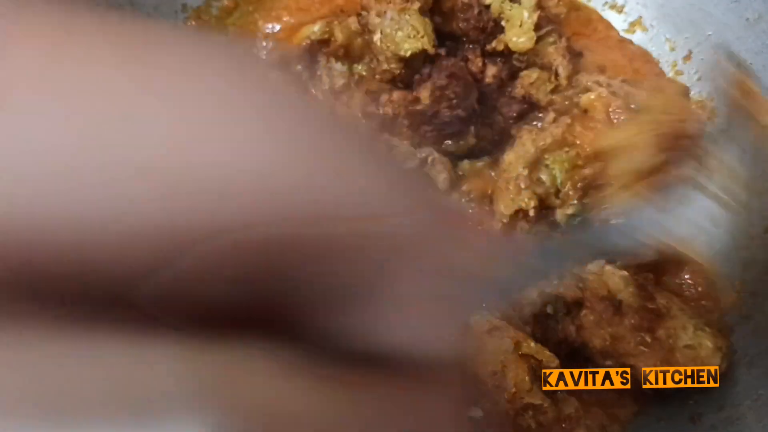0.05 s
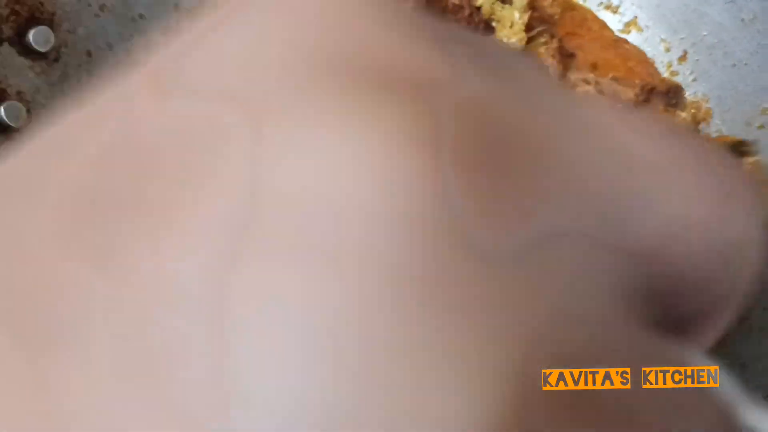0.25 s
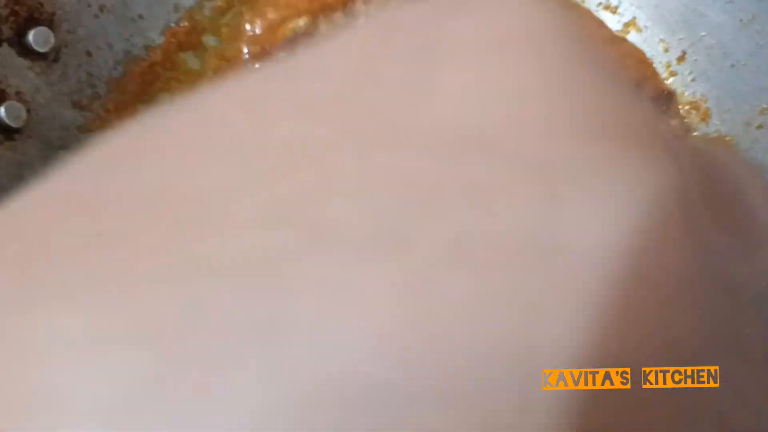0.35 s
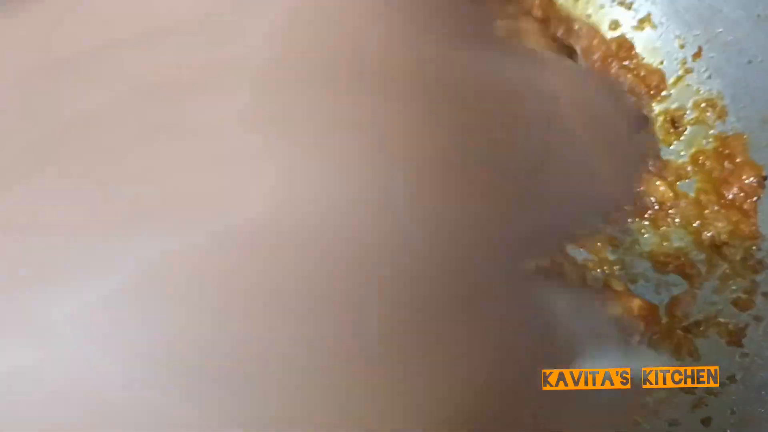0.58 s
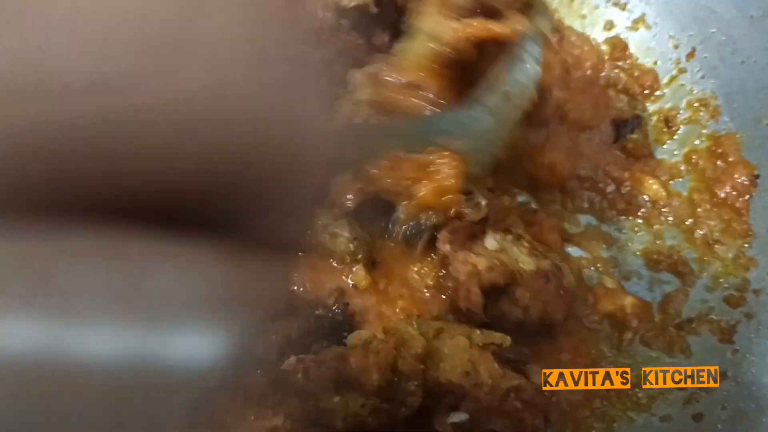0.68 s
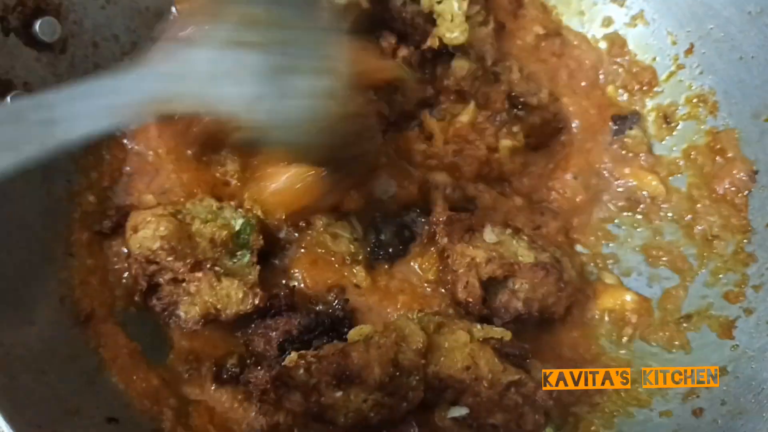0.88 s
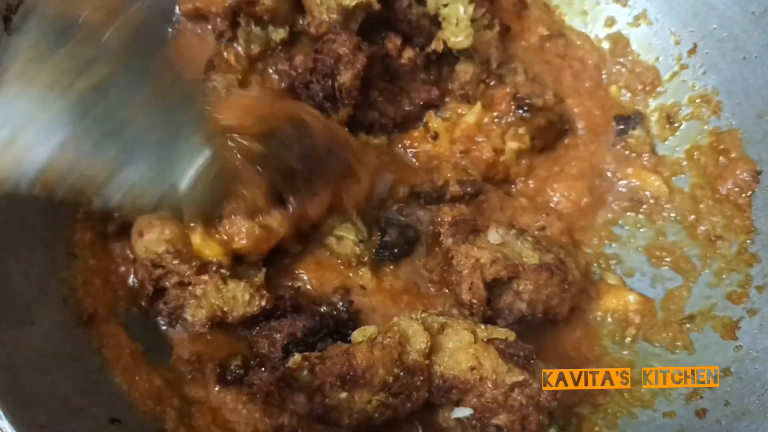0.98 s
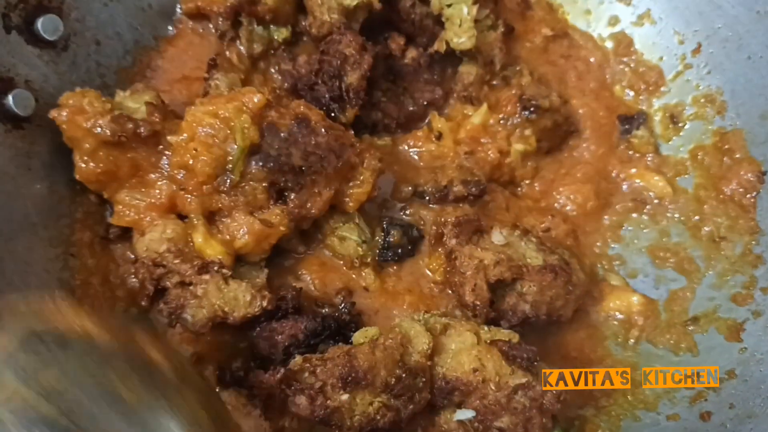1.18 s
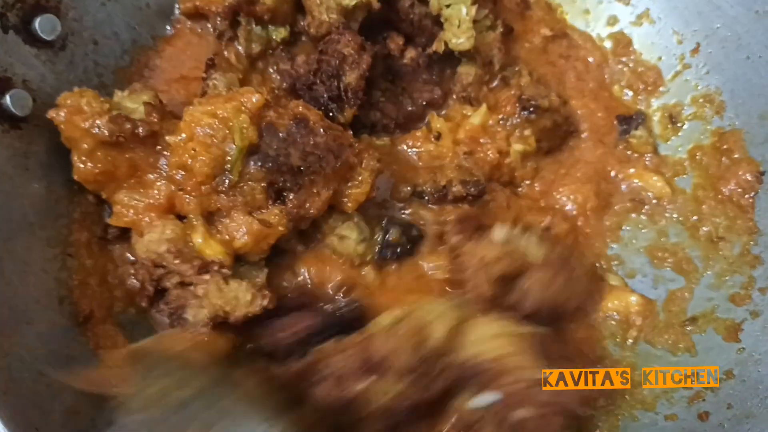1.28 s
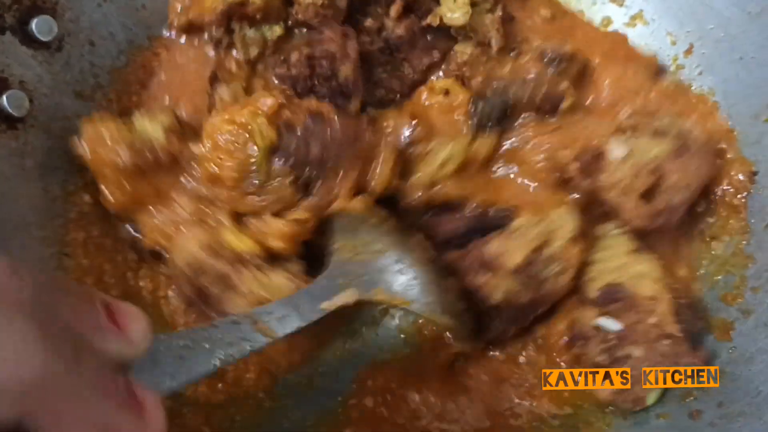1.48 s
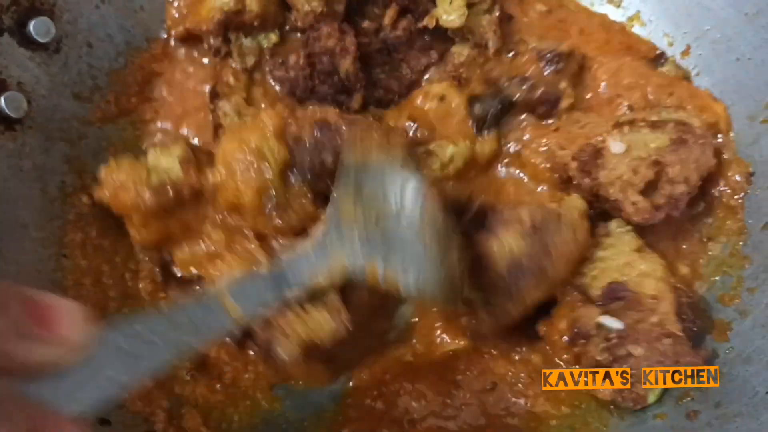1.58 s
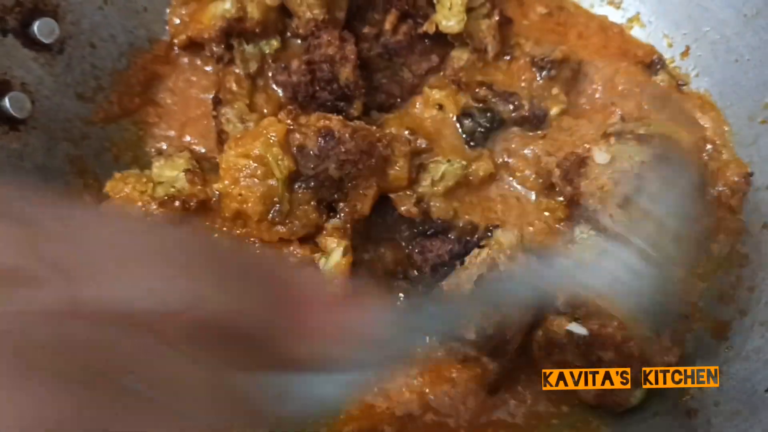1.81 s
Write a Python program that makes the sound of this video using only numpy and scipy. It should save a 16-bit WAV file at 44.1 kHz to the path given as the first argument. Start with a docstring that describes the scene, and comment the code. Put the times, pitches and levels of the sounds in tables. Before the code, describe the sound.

Metal spoon scraping a pan bottom, three gritty strokes with sharp clacks and small wet ticks

```python
"""Metal spoon stirs thick curry in a metal pan, close to the microphone in a small kitchen.
Light drags and thin pan notes lead into a first scrape: stick-slip grains through a pan colour.
It grows duller as the spoon slows; wet ticks (short noise bursts) and soft notes follow.
A second and a third scrape each start with a sharp clack; a low resonance rises within the second.
Drags, notes and ticks fall around them; sizzle grains and air, rising and falling in level, run throughout."""
import sys
import numpy as np
from scipy import signal
from scipy.fft import rfft, irfft, next_fast_len
from scipy.io import wavfile
from scipy.ndimage import uniform_filter1d

SR = 44100
rng = np.random.default_rng(int(sys.argv[2]) if len(sys.argv) > 2 else 0)


def unload_audio(sound):
    """Save the sound as a 16-bit wav file, at the path given as the first command line argument."""
    columns = np.transpose(np.atleast_2d(sound))
    # keep every value between -1 and 1, then stretch to whole-number steps
    steps = np.round(np.clip(columns, -1, 1) * 32767)
    wavfile.write(sys.argv[1], SR, steps.astype(np.int16))


N = 81585
T = np.arange(N) / SR

# scrape force: t/s, level/dB
FORCE_1 = [(.1425, -24), (.1445, -24), (.2, -23.5), (.25, -30), (.3, -40.5), (.36, -79), (.4, -75)]
FORCE_2 = [(.787, -33), (.8, -36), (.86, -30.5), (.9, -35), (.95, -41.5), (1.0, -57.5), (1.03, -61)]
FORCE_3 = [(1.456, -39), (1.473, -41.5), (1.505, -34), (1.518, -31.5), (1.54, -34.5), (1.585, -39.5),
           (1.645, -38.5), (1.7, -55.5), (1.76, -127)]
# pan colour where each stroke rubs: f/Hz, level/dB
COLOUR_1 = [(76, -86), (130, -19.5), (303, -12), (394, -9.5), (660, -12.5), (829, -11.5), (935, -21.5),
            (1060, -3.5), (1520, -16), (2140, -5.5), (3200, -12), (6600, -16.5), (7910, -26), (9870, -21),
            (13100, -40), (15100, -25), (16000, -38)]
COLOUR_2 = [(76, -74), (130, -41), (263, -20.5), (342, 2), (410, -10.5), (650, -10), (917, -11),
            (1030, -14), (1400, -10.5), (1680, 0.5), (1930, -13), (2560, -0.5), (2830, -9.5), (4780, -12),
            (6340, -10), (8070, -21.5), (10300, -9.5), (13300, -34), (16000, -19)]
COLOUR_3 = [(76, -40), (130, -15), (260, -16), (349, -2), (402, -3), (570, -16.5), (812, 2.5),
            (1270, -39.5), (1430, -16), (1680, -13), (2510, -4), (3010, -11), (3530, -23), (4150, -4),
            (5960, -18), (6470, -2), (8230, -18), (9670, -11), (11800, -15), (12800, -51), (14200, -19),
            (16000, -26)]
# scrapes: force, colour, dulling/(dB per s per kHz), pan ring/dB, bass rise/s
SCRAPES = [(FORCE_1, COLOUR_1, 18.4, -14, 0.008), (FORCE_2, COLOUR_2, 7.1, -11.5, 0.095),
           (FORCE_3, COLOUR_3, 8.6, -18, 0.0075)]
# pan modes: f/Hz, level/dB, t60/s
PAN_MODES = [(625, 8, .08), (1028, 2, .16), (1225, 3, .16), (1345, -1, .16), (2072, 2.5, .2), (2200, 3, .2),
             (2466, 1, .18), (2670, -4, .18), (3130, -1, .15)]
# spoon landing: t/s, level/dB, decay/s, ring f/Hz, ring level/dB, ring decay/s, thump level/dB,
# right minus left/dB (crack and ring, ahead of the port balance)
CLACKS = [(0.7874, -12.5, 0.0024, 2600, -17.5, 0.0026, -46.5, 2.5),
          (1.4558, -19, 0.0044, 4640, -29, 0.0032, -60.5, -0.5)]
# colour of the crack: f/Hz, level/dB
CLACK_COLOUR = [(200, -50), (900, -14), (1450, -32), (1800, -29.5), (2750, 3.5), (3600, -12), (5000, -10),
                (7000, 0.5), (8200, -9), (9500, 3), (11000, -4.5), (13000, -16), (15000, -2), (16000, -2.5)]
# drags, one resonance each: peak t/s, rise/s, fall/s, level/dB, centre f/Hz, width/octave
DRAGS = [(.003, 0.033, 0.018, -40.5, 2310, 0.28), (.075, 0.02, 0.021, -56.5, 4140, 0.15),
         (1.045, 0.026, 0.059, -53, 2090, 0.4), (1.06, 0.08, 0.049, -61, 4900, 0.051),
         (1.496, 0.022, 0.017, -40.5, 351, 0.11), (1.169, 0.036, 0.013, -62.5, 3760, .05),
         (1.29, 0.026, 0.051, -68, 3620, 0.043), (1.73, 0.17, 0.0074, -58.5, 1500, 0.12),
         (1.79, 0.018, 0.0048, -56, 3960, 0.087)]
# thin notes of the pan: peak t/s, swell/s, level/dB, f/Hz
NOTES = [(0.018, 0.05, -53, 2300), (.005, 0.043, -48, 3180), (0.009, 0.026, -60.5, 3500),
         (.02, 0.012, -55, 4360), (0.091, 0.041, -59, 1440), (0.3, 0.066, -52.5, 2070),
         (0.31, 0.057, -54, 3760), (1.05, 0.018, -57, 2400), (1.54, 0.044, -52, 2424),
         (1.609, 0.021, -50, 1410)]
# hollow opened in the sauce: t/s, f/Hz, level/dB
HOLLOW = [(0.793, 345.2, -62), (.835, 346.4, -39.5), (.91, 356, -49.5), (.935, 487, -39), (0.981, 499, -45),
          (1.02, 505, -84)]
# pushes that rock the pan: start t/s, end t/s, level/dB
PUSHES = [(0.172, 0.325, -52), (1.496, 1.664, -63.5)]
# low modes of the rocking pan: f/Hz, relative level/dB
THRUM_MODES = [(85.5, 3), (112, -4)]
# wet ticks and small touches: t/s, level/dB, f/Hz, decay/s
TICKS = [(.4295, -47, 3900, .002), (.4946, -42.5, 6500, .001), (.525, -44, 5200, .002),
         (.5834, -46, 4770, .0015), (1.2221, -49, 10400, .0015), (1.3892, -47, 4190, .002),
         (1.7074, -32, 5300, .0012), (1.5218, -22, 10200, .0012), (1.7108, -40, 4800, .003),
         (1.711, -42, 10000, .004), (1.7625, -30, 10000, .0012), (1.7772, -43, 4200, .0015),
         (1.8438, -46, 2300, .003)]
# sizzle bubbles by size: f/Hz, level/dB ahead of BACK_GAIN, width/octave
SIZZLE = [(5060, -70.5, 0.45), (10180, -68.5, .08), (14800, -84.5, 0.027)]
# colour of the kitchen air: f/Hz, level/dB
AIR_COLOUR = [(25, -8), (90, 0.5), (140, -7), (240, 4.5), (350, 5), (480, -1.5), (900, -3), (1500, -8.5),
              (2100, -5.5), (5500, -12.5), (8200, -30.5), (10000, -10.5), (13300, -52), (15500, -9.5)]
# gain on sizzle and air: t/s, level/dB
BACK_GAIN = [(0, 6), (.42, 1), (.48, 3.5), (.76, 1.5), (.87, 11), (1.15, 0), (1.235, -5), (1.25, 3.5),
             (1.45, -0.5), (1.85, 0)]
# room decay: f/Hz, t60/s
ROOM_DECAY = [(300, 0.17), (2500, 0.32), (8000, 0.17), (16000, 0.025)]
# port balance, left minus right: f/Hz, level/dB
BALANCE = [(100, 0.5), (1000, -1.7), (2500, 0.6), (5000, 1), (9500, 0), (12500, -6), (15500, -10)]

SLIPS_PER_S, SLIP_SPREAD_DB = 7000, 3.0
JUDDER_DB, JUDDER_SMOOTH_S = 1.8, 1 / 91.4
BASS_HZ = 620
METAL_COUNT, METAL_SHARE, METAL_T60_S = 160, .6, .08
THUMP_HZ, THUMP_DECAY_S = 129, 0.0044
NOTE_WAVER_HZ, HOLLOW_WAVER_HZ, THRUM_WAVER_HZ, WAVER_SMOOTH_S = 16, 18, 8, .012
PUSH_EDGE_S = 0.02
TICK_WIDTH_OCTAVE_HZ = 850  # width/octave times f/Hz
POPS_PER_S, POP_SPREAD_DB = 1500, 4.2
AIR_DB, AIR_SHARED = -65, 0.44  # AIR_DB ahead of BACK_GAIN
ROOM_DB = -5.5
LEFT_LATE_S, SHARED = 0.000866, 0.34  # SHARED: power share common to both ports
EDGE_HZ = 16100
FRAME, HOP = 256, 128  # STFT samples


def scrape(force, colour, dulling, ring_db, bass_rise_s, rubbing):
    """Stick-slip grains drive the pan; bass builds up, treble fades as the spoon slows in the sauce."""
    level = amp(np.interp(T, *np.transpose(force), left=-150, right=-150))
    judder = smooth_noise(JUDDER_SMOOTH_S)
    slips = rubbing * amp(JUDDER_DB * judder)
    hz, t, z = signal.stft(tint(slips, colour), SR, nperseg=FRAME)
    hz = hz[:, None]
    t = np.clip(t, force[0][0], force[-1][0])
    # neutral at the energy centre: brighter before, duller after
    centre_s = np.average(T, weights=level ** 2)
    dull = amp(-dulling * (t - centre_s) * np.minimum(hz, 11000) / 1e3)
    build = 1 - np.exp(-(t - force[0][0]) / bass_rise_s - (hz / BASS_HZ) ** 2 / 2)
    # moving contact shifts the resonances; grit catches in bursts; bass is spared
    shifts = patches(z.shape[1:], depth_db=2.9, length_s=.07, width_hz=350)
    bursts = patches(z.shape[1:], depth_db=2.3, length_s=.014, width_hz=1400)
    grit = (shifts * bursts) ** (hz / (hz + BASS_HZ))
    rub = level * signal.istft(z * dull * build * grit, SR, nperseg=FRAME)[1][:, :N]
    rub = signal.sosfilt(signal.butter(2, 70, "high", fs=SR, output="sos"), rub)
    return rub + amp(ring_db) * ring(rub, PAN_MODES)


def metal():
    """Steady rubbing: slips ring many short, high modes of spoon and pan, giving a metallic grain."""
    t = T[:SR // 8]
    place, size, left, right = rng.random((METAL_COUNT, 4)).T[:, :, None]
    index = np.arange(METAL_COUNT)[:, None]
    hz = 900 + 15000 * ((index + place) / METAL_COUNT) ** 1.5
    waves = np.sin(2 * np.pi * (hz * t + np.array([left, right])))
    body = ((1 + size) * hz ** .2 * waves).sum(1) * amp(-60 * t / METAL_T60_S)
    slips = grains(SLIPS_PER_S, SLIP_SPREAD_DB)
    highs = unit(irfft(rfft(slips, N) * rfft(body, N), N))
    low_pass = signal.butter(4, 900, fs=SR, output="sos")
    lows = signal.sosfilt(low_pass, grains(SLIPS_PER_S, SLIP_SPREAD_DB))
    bare = grains(SLIPS_PER_S, SLIP_SPREAD_DB)
    return np.sqrt(1 - METAL_SHARE) * bare + np.sqrt(METAL_SHARE) * (highs + lows)


def clack(s, db, decay_s, hz, ring_db, ring_s, thump_db, right_db):
    """Metal meets metal: a bright crack, a short ring of the spoon and a soft thump."""
    crack = amp(db) * tint(burst(s, decay_s) * noise(SHARED), CLACK_COLOUR)
    spoon = amp(ring_db) * tint(burst(s, ring_s) * noise(SHARED), band(hz, octaves=0.072))
    thump = amp(thump_db) * burst(s, THUMP_DECAY_S) * np.sin(2 * np.pi * THUMP_HZ * (T - s))
    return (crack + spoon) * amp([[-right_db / 2], [right_db / 2]]) + thump


def drag(s, rise_s, fall_s, db, hz, octaves, rubbing):
    """Spoon drags through the food; one resonance swells and fades."""
    swell = np.exp(-((T - s) / np.where(T < s, rise_s, fall_s)) ** 2)
    return amp(db) * swell * tint(rubbing, band(hz, octaves))


def notes():
    """The sliding spoon makes single pan modes sing out and fade."""
    total = 0
    for s, swell_s, db, hz in NOTES:
        swell = np.exp(-((T - s) / swell_s) ** 2)
        total = total + amp(db) * swell * tone(hz, NOTE_WAVER_HZ)
    return total


def hollow():
    """A low resonance rises in pitch as the second stroke pushes through the sauce."""
    s, hz, db = np.transpose(HOLLOW)
    gate = (T > s[0]) * (T < s[-1])
    return gate * amp(np.interp(T, s, db)) * tone(np.interp(T, s, hz), HOLLOW_WAVER_HZ)


def thrum():
    """Pan rocks on the stove during each push; its low modes sound with soft edges."""
    push = 0
    for start, end, db in PUSHES:
        outside_s = abs(T - np.clip(T, start, end))
        push = push + amp(db) * np.exp(-outside_s / PUSH_EDGE_S)
    return push * unit(sum(amp(db) * tone(hz, THRUM_WAVER_HZ) for hz, db in THRUM_MODES))


def ticks():
    """Sauce bubbles snap and the spoon edge touches the pan: short band-limited noise bursts."""
    hiss = noise(SHARED)
    total = 0
    for s, db, hz, decay_s in TICKS:
        shape = band(hz, TICK_WIDTH_OCTAVE_HZ / hz)
        total = total + amp(db) * tint(burst(s, decay_s) * hiss, shape)
    return total


def background():
    """Oil crackles faintly as resonant grains over kitchen air; one level curve moves both."""
    sizzle = 0
    for hz, db, octaves in SIZZLE:
        pops = grains(POPS_PER_S, POP_SPREAD_DB)
        sizzle = sizzle + amp(db) * tint(pops, band(hz, octaves))
    air = amp(AIR_DB) * tint(noise(AIR_SHARED), AIR_COLOUR)
    return (sizzle + air) * amp(np.interp(T, *np.transpose(BACK_GAIN)))


def room(x):
    """Short diffuse tail of pan and kitchen: noise with frequency-dependent decay."""
    hz, t, z = signal.stft(rng.standard_normal((2, SR // 2)), SR, nperseg=FRAME)
    decay = amp(-60 * t / read(ROOM_DECAY, hz)[:, None])
    tail = signal.istft(z * decay, SR, nperseg=FRAME)[1]
    return signal.fftconvolve(x, tail / np.linalg.norm(tail[0]), axes=1)[:, :N]


def ring(x, modes):
    """Rings decaying modes at the rms of x; each reaches the two ports in its own phase."""
    t = T[:SR // 2]
    body = 0
    for hz, db, t60 in modes:
        phase = rng.random((2, 1))
        body = body + amp(db - 60 * t / t60) * np.sin(2 * np.pi * (hz * t + phase))
    y = signal.fftconvolve(x, body, axes=1)[:, :N]
    return unit(y) * x.std()


def patches(shape, depth_db, length_s, width_hz):
    """Random gains over frequency and time, smoothed over the given length and width."""
    field = uniform_filter1d(rng.standard_normal(shape), round(length_s * SR / HOP), 1)
    field = uniform_filter1d(field, round(width_hz * FRAME / SR), 0)
    return unit(amp(depth_db * unit(field)))


def tone(hz, waver_hz):
    """Unsteady sine of rms 1, later at the left port; waver_hz is the rms deviation."""
    turns = np.cumsum(hz + waver_hz * smooth_noise(WAVER_SMOOTH_S)) / SR
    return np.sqrt(2) * np.sin(2 * np.pi * np.array([turns - hz * LEFT_LATE_S, turns]))


def smooth_noise(window_s):
    """Slow random curve of rms 1: noise under a moving average."""
    return unit(uniform_filter1d(rng.standard_normal(N), int(window_s * SR)))


def burst(s, decay_s):
    """Sudden start and exponential fall."""
    return (T >= s) * np.exp(-np.maximum(T - s, 0) / decay_s)


def grains(per_s, spread_db):
    """Random tiny impacts of uneven size at both ports, rms 1."""
    hits = rng.random(N) < per_s / SR
    size = hits * amp(spread_db * np.minimum(rng.exponential(1, N), 4))
    z = size * rng.choice([-1., 1.], (3, N))
    return unit(ports(z[0], z[1:], SHARED))


def noise(shared):
    """White noise at both ports."""
    z = rng.standard_normal((3, N))
    return ports(z[0], z[1:], shared)


def ports(common, own, shared):
    """Two microphone ports: the shared part reaches the left one later."""
    both = np.array([np.roll(common, round(LEFT_LATE_S * SR)), common])
    return np.sqrt(shared) * both + np.sqrt(1 - shared) * own


def tint(x, points):
    """Causal minimum-phase filter of unit power with the given (f/Hz, level/dB) shape."""
    size = 4096
    # fold the cepstrum onto positive time
    cep = irfft(np.log(amp(read(points, np.fft.rfftfreq(size, 1 / SR)))))
    cep[1:size // 2] *= 2
    cep[size // 2 + 1:] = 0
    taps = irfft(np.exp(rfft(cep)))
    return signal.fftconvolve(x, taps[None] / np.linalg.norm(taps), axes=1)[:, :N]


def band(hz, octaves):
    """One resonance as a (f/Hz, level/dB) shape."""
    f = np.geomspace(50, 20000, 300)
    return np.c_[f, -20 * np.log10(1 + (np.log2(f / hz) / octaves) ** 2 / 2)]


def read(points, hz):
    """Reads a table on a log-frequency axis."""
    f, v = np.transpose(points)
    return np.interp(np.log(hz + 1), np.log(f + 1), v)


def amp(db):
    """Decibels to gain."""
    return 10 ** (np.asarray(db) / 20)


def unit(x):
    """Scales to rms 1."""
    return x / np.sqrt(np.mean(x ** 2) + 1e-20)


def scene():
    """Spoon and pan in the room, over the sizzle; each stroke rubs a spot with its own fine modes."""
    rubbing = metal()  # one texture for all drags
    scrapes = sum(scrape(*r, metal()) for r in SCRAPES)
    clacks = sum(clack(*r) for r in CLACKS)
    drags = sum(drag(*r, rubbing) for r in DRAGS)
    spoon = scrapes + clacks + drags + ticks()
    return spoon + amp(ROOM_DB) * room(spoon) + notes() + hollow() + thrum() + background()


def record(dry):
    """Port balance over frequency (less top at the left), then the band limit."""
    size = next_fast_len(N + 4096)
    tilt = read(BALANCE, np.fft.rfftfreq(size, 1 / SR))
    heard = irfft(rfft(dry, size) * amp(np.array([tilt, -tilt]) / 2), size)[:, :N]
    low_pass = signal.firwin(255, EDGE_HZ, window=("kaiser", 8), fs=SR)
    return signal.oaconvolve(heard, low_pass[None], "same")


dry = scene()
out = record(dry)
unload_audio(out)
```